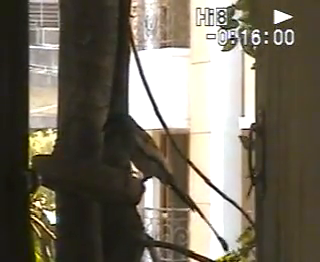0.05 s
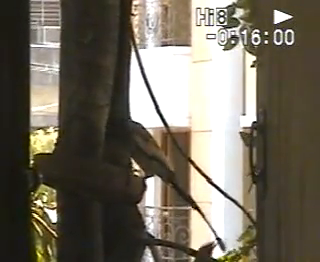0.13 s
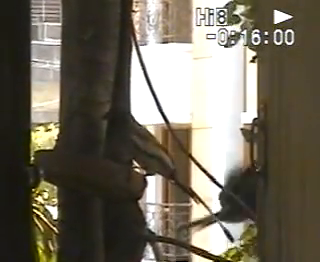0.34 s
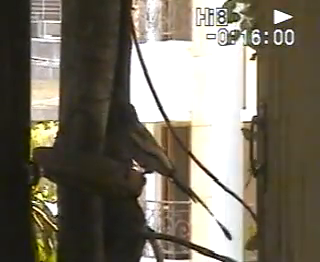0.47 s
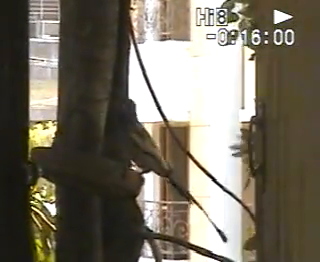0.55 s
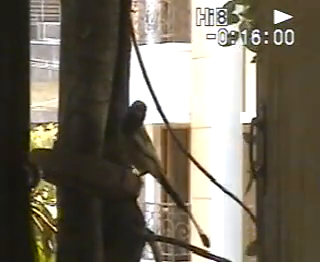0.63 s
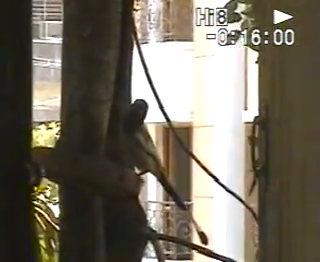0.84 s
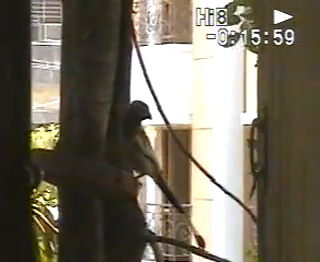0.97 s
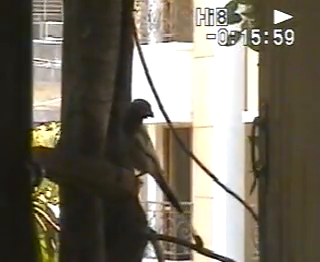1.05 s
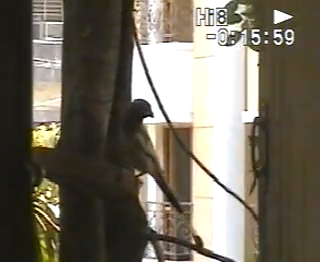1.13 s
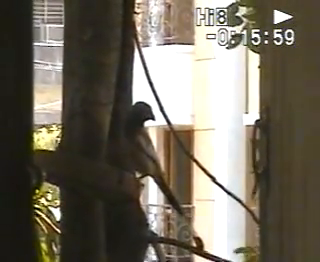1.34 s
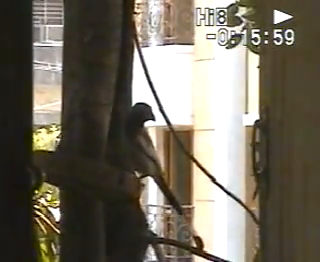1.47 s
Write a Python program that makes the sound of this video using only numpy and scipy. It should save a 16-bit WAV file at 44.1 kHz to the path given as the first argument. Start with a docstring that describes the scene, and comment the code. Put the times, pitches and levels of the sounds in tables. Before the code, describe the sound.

A bird calls three quick rising notes close by, echoing off walls over faint hiss.

```python
"""A treepie between house walls

A treepie calls three quick rising notes close by, each a rasping whistle that slides up and holds.
The walls reflect the call and ring on after it, and the two loud notes overload the input.
Behind it are a low outdoor rumble, tape hiss, a few soft thumps and faint far hoots."""
import sys
import numpy as np
from scipy import signal
from scipy.fft import rfft, irfft
from scipy.io import wavfile
from scipy.ndimage import uniform_filter1d

SR = 44100
rng = np.random.default_rng(int(sys.argv[2]) if len(sys.argv) > 2 else 0)


def materialize(psi):
    """Save the field psi as 16-bit PCM at rate SR to the path in sys.argv[1].

    A 1-D psi becomes a single channel; in a 2-D psi each row is a channel.
    """
    bounded = np.clip(np.atleast_2d(psi).T, -1, 1)
    quanta = np.round(bounded * 32767).astype(np.int16)
    wavfile.write(sys.argv[1], SR, quanta)


N = 66150
TIME = np.arange(N) / SR


def amp(db):
    """Amplitude ratio of a level in decibels."""
    return 10 ** (np.asarray(db) / 20)


def unit(x):
    """Normalisation to an rms of one."""
    return x / np.sqrt(np.mean(x ** 2) + 1e-20)


def log_interp(points, hz):
    """Interpolation of a table along a logarithmic frequency axis."""
    f, value = np.transpose(points)
    return np.interp(np.log(hz + 1), np.log(f + 1), value)


def noise(gain_at):
    """Spectral shaping: white noise weighted by a gain at each frequency, at unit rms."""
    return unit(irfft(rfft(rng.standard_normal(N)) * gain_at(np.fft.rfftfreq(N, 1 / SR)), N))


def lowpass(x, hz):
    """Steep zero-phase low-pass filter."""
    return signal.oaconvolve(x, signal.firwin(301, hz, window=("kaiser", 8), fs=SR), "same")


def ease(u):
    """Raised-cosine step from 0 to 1."""
    return np.sin(np.pi / 2 * np.clip(u, 0, 1)) ** 2


def rumble_and_hiss():
    """Broadband noise: outdoor rumble and tape hiss, whose level drifts in patches, most in the bass."""
    # Each row: frequency in hertz, relative spectral density in dB.
    spectrum = [(15, -38.5), (25, -5), (48, -19), (118, -0.5), (157, -7.5), (213, -0.5), (325, -8.5),
                (383, -7), (462, -13), (508, -6), (545, -11), (1010, -11.5), (1990, -19.5), (3420, -19.5),
                (4320, -22.5), (5340, -12.5), (6920, -21), (9000, -58.5), (15200, -120)]
    steady = noise(lambda f: amp(log_interp(spectrum, f)))
    hz, _, bands = signal.stft(steady, SR, nperseg=1024)
    patches = uniform_filter1d(rng.standard_normal(bands.shape), size=8, axis=0)
    patches = unit(uniform_filter1d(patches, size=12, axis=1))
    drift_db = 1.5 * patches / (1 + hz[:, None] / 2000)
    return amp(-35.5) * unit(signal.istft(bands * amp(drift_db), SR, nperseg=1024)[1][:N])


def soft_thumps(rise_s=0.013, half_width_octaves=0.59):
    """Damped transients: bands of low noise swell quickly and decay exponentially."""
    # Each row: start in seconds, peak level in dB, centre frequency in hertz.
    thumps = [(0.233, -32, 135), (0.454, -33.5, 127), (.865, -28.5, 275), (1.031, -34, 192),
              (1.146, -27.5, 141), (1.344, -38, 125)]
    sound = np.zeros(N)
    for start, level_db, centre_hz in thumps:
        age = np.maximum(TIME - start, 0) / rise_s
        body = noise(lambda f: 1 / (1 + (np.log2((f + 1) / centre_hz) / half_width_octaves) ** 2))
        sound += amp(level_db) * age * np.exp(1 - age) * body
    return sound


def far_hoots(pitch_hz=786, half_width_hz=25, length_s=0.045):
    """Narrow-band noise has a blurred pitch; half-sine envelopes cut it into short, soft hoots."""
    # Each row: start in seconds, peak level in dB.
    hoots = [(0.686, -34.5), (0.818, -33), (1.061, -36)]
    sound = np.zeros(N)
    for start, level_db in hoots:
        tone = noise(lambda f: 1 / (1 + ((f - pitch_hz) / half_width_hz) ** 2))
        envelope = np.sin(np.pi * np.clip((TIME - start) / length_s, 0, 1))
        sound += amp(level_db) * envelope * tone
    return sound


def yard_reverb(x, delay_s=0.0072, build_s=0.0065):
    """Reverberation: a diffuse tail builds up, then each band decays exponentially at its own rate."""
    # Each row: frequency in hertz, time to decay by 60 dB in seconds.
    decay_times = [(300, 1), (1200, 0.7), (1700, 0.6), (2250, 0.74), (3200, 0.59), (6000, 0.49),
                   (8000, 0.87)]
    hz, t, bands = signal.stft(rng.standard_normal(N), SR, nperseg=256)
    decay = amp(-60 * t / log_interp(decay_times, hz)[:, None])
    tail = signal.istft(bands * decay, SR, nperseg=256)[1][:N]
    tail *= ease((TIME - delay_s) / build_s)
    return signal.fftconvolve(x, tail / np.linalg.norm(tail))[:N]


def far_echo(x, delay_s=0.43):
    """Echo: the long path to distant houses and back returns the sound late, faint and blurred."""
    return amp(-32.5) * np.interp(TIME - delay_s, TIME, yard_reverb(x), left=0)


def wall_reflections(x):
    """Early reflections: each near wall returns a delayed, weaker copy."""
    # Each row: delay in seconds, gain in dB.
    echoes = [(.0085, -9.5), (.0135, -9), (.021, -10), (.034, -14.5), (.043, -10), (0.055, -17),
              (.1, -15.5)]
    return sum(amp(db) * np.interp(TIME - delay, TIME, x, left=0) for delay, db in echoes)


def note(course, gain_db, jitter, third_db, step_db, beak_hz, half_width_hz):
    """Source and filter: a gliding whistle whose overtones flare as they cross the beak resonance."""
    waver_hz, fade_s = 252, 0.0019
    times, pitch_hz, level_db, rasp_db = np.transpose(course)
    waver = noise(lambda f: 1 / (1 + (f / waver_hz) ** 2))
    hz = np.interp(TIME, times, pitch_hz) * (1 + jitter * waver)
    phase = 2 * np.pi * np.cumsum(hz) / SR
    voice = np.sin(phase) + amp(-29.5) * np.sin(2 * phase)
    for harmonic in (3, 4, 5):
        resonance = 1 / (1 + ((harmonic * hz - beak_hz) / half_width_hz) ** 2)
        voice += amp(third_db + step_db * (harmonic - 3)) * resonance * np.sin(harmonic * phase)
    # Fast, uneven amplitude modulation puts sidebands around each partial, heard as rasp.
    sideband_hz = 0.6 * pitch_hz.max()
    flutter = noise(lambda f: 1 / (1 + (f / sideband_hz) ** 20))
    voice *= 1 + amp(0.5 + np.interp(TIME, times, rasp_db)) * flutter
    gate = ease((TIME - times[0]) / fade_s) * ease((times[-1] - TIME) / fade_s)
    return amp(gain_db + np.interp(TIME, times, level_db)) * gate * voice


def treepie():
    """Frequency modulation: three upward glides, one soft and two loud, each reaching a higher pitch."""
    # Each row: time in seconds, pitch in hertz, relative level in dB, relative rasp depth in dB.
    first = [(.211, 760, -29, 3), (.221, 866, -33.5, -3.5), (.229, 1087, -19, -10),
             (.238, 1181, -10.5, -36), (.244, 1175, -17.5, -16), (.251, 1416, -19, -6),
             (.258, 1550, -37.5, -0.5)]
    second = [(.290, 950, -28, -30), (.299, 1150, -7, -30), (.306, 1490, -5, -30), (.309, 1780, -5, -20),
              (.312, 1960, -1, -16), (.318, 1985, -1, -22), (.325, 1925, 0, -30), (.333, 1860, -4, -30),
              (.340, 1780, -24, -30)]
    third = [(.456, 1018, -27, -36), (.466, 1372, -5.5, -33), (.472, 1659, 1.5, -17),
             (.478, 2132, 3, -23.5), (.485, 2222, -8, -21), (.495, 2319, -2, -2.5), (.504, 2264, -5, -22.5),
             (.514, 2231, -3.5, -35.5), (.523, 2026, -13, -37.5)]
    return (
        note(first, 0.7, jitter=0.024, third_db=-20, step_db=2, beak_hz=6100, half_width_hz=380)
        + note(second, 0.33, jitter=0.01, third_db=-2.5, step_db=-0.5, beak_hz=5920, half_width_hz=141)
        + note(third, 2.25, jitter=0.013, third_db=-16.5, step_db=-31, beak_hz=6700, half_width_hz=2040)
    )


def scene():
    """Superposition: the direct call and its reflections add to the background."""
    bird = treepie()
    call = bird + wall_reflections(bird) + amp(0.5) * yard_reverb(bird)
    hoots = far_hoots()
    background = rumble_and_hiss() + hoots + amp(-5.5) * yard_reverb(hoots) + soft_thumps()
    return (background + far_echo(bird) + call)[None]


def record(dry):
    """Compression and saturation: a band-limited input lowers its gain and rounds off loud peaks."""
    threshold_db, duck_share, attack_s = -11.5, 0.16, 0.0067
    knee, treble_hz = 0.61, 12000
    x = lowpass(dry[0], hz=7050)
    power_db = 10 * np.log10(abs(uniform_filter1d(x ** 2, size=256)) + 1e-12)
    # The gain falls by a share of the greatest excess so far and stays down.
    duck_db = np.maximum.accumulate(duck_share * np.maximum(power_db - threshold_db, 0))
    pole = np.exp(-1 / (attack_s * SR))
    x *= amp(-signal.lfilter([1 - pole], [1, -pole], duck_db))
    linear = np.clip(x, -knee, knee)
    saturated = linear + (1 - knee) * np.tanh((x - linear) / (1 - knee))
    dulled = irfft(rfft(saturated) / (1 + (np.fft.rfftfreq(N, 1 / SR) / treble_hz) ** 4), N)
    return lowpass(dulled, hz=16000)[None]


dry = scene()
out = record(dry)
materialize(out)
```